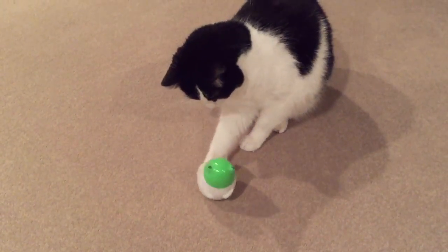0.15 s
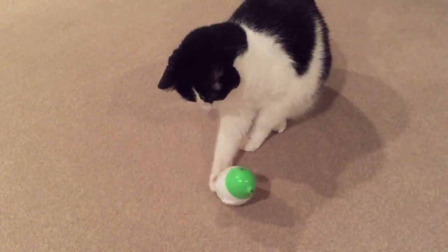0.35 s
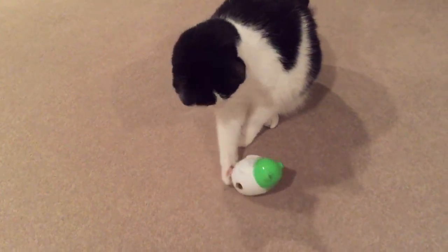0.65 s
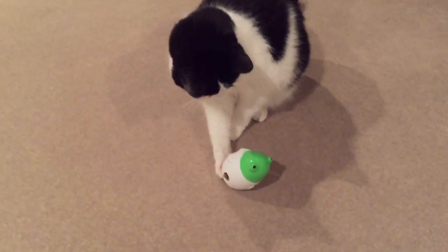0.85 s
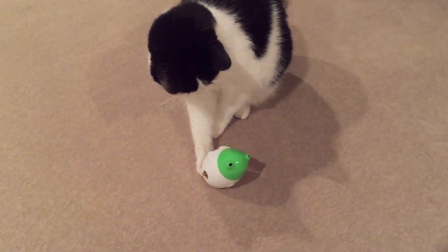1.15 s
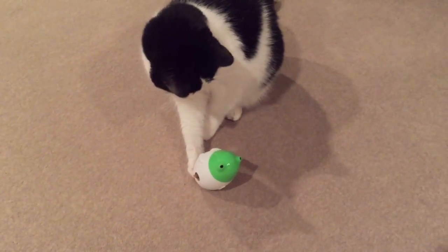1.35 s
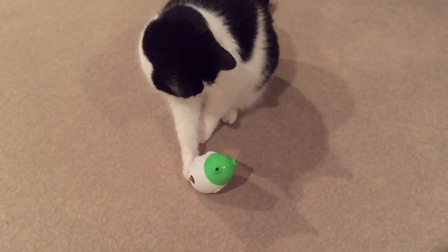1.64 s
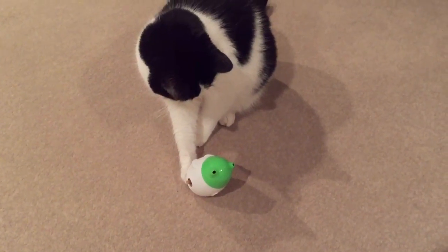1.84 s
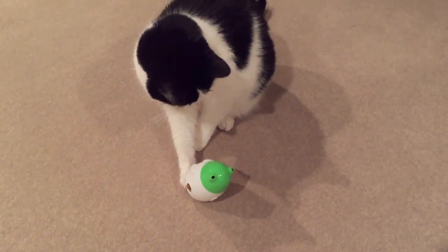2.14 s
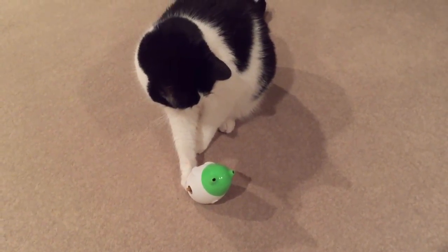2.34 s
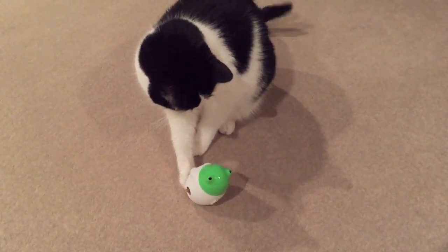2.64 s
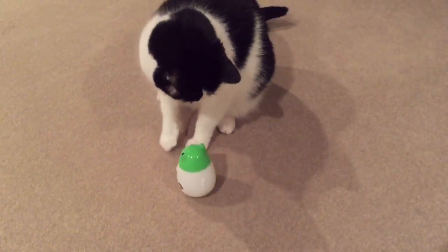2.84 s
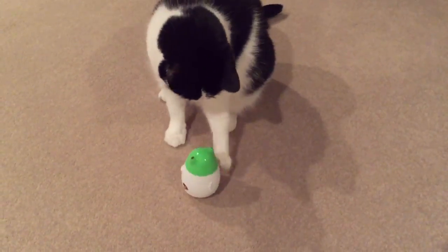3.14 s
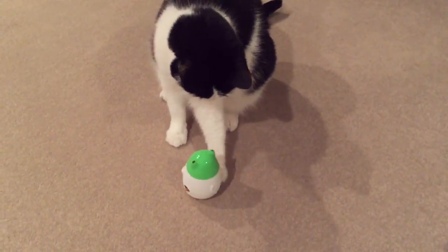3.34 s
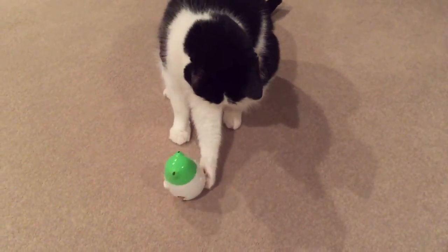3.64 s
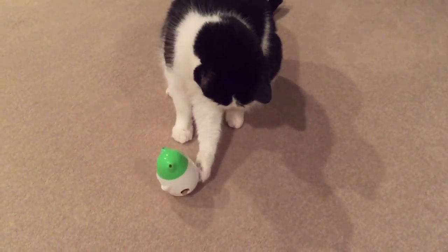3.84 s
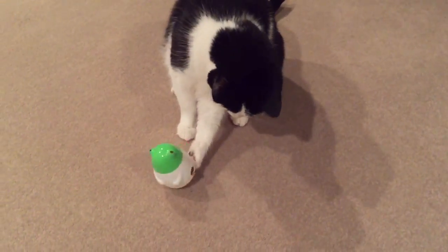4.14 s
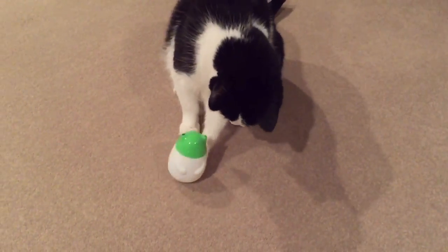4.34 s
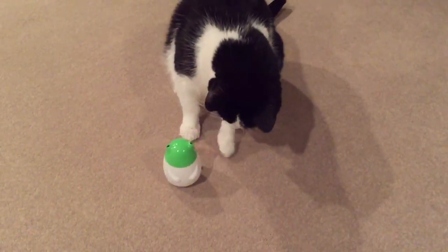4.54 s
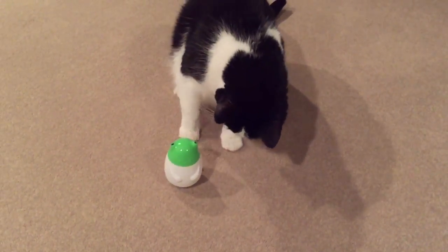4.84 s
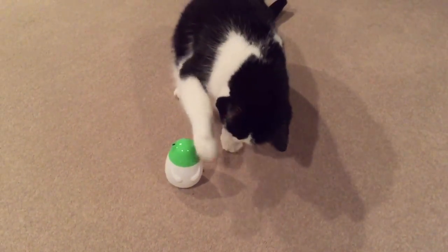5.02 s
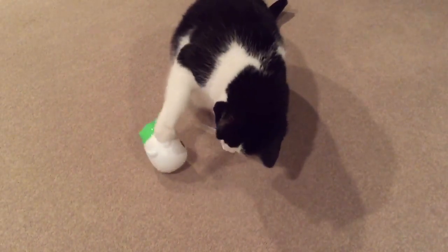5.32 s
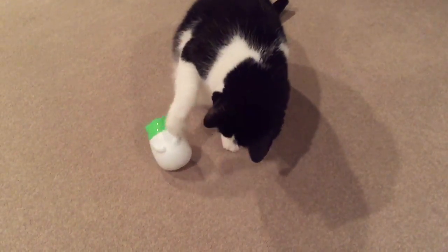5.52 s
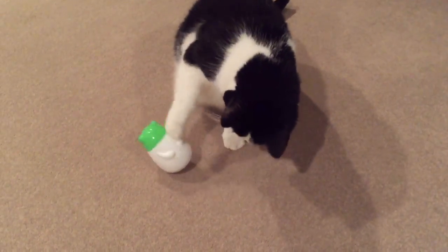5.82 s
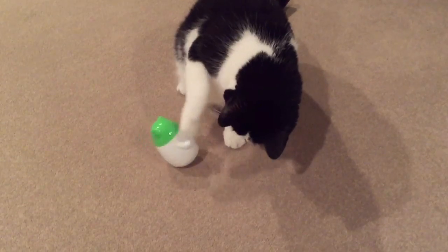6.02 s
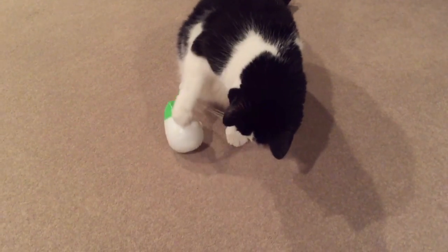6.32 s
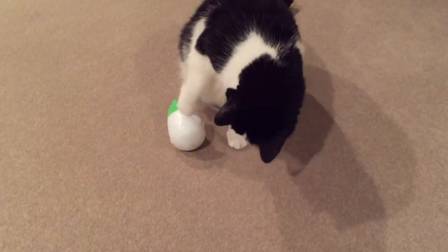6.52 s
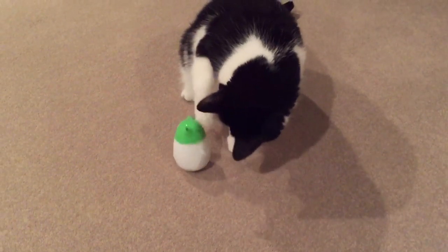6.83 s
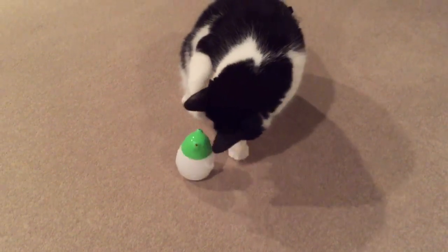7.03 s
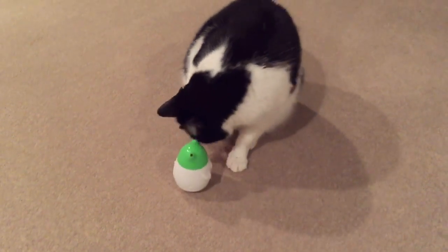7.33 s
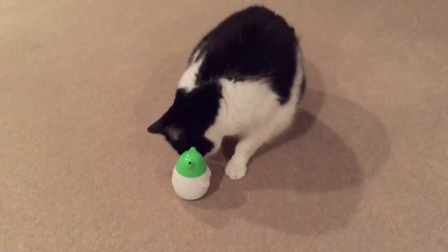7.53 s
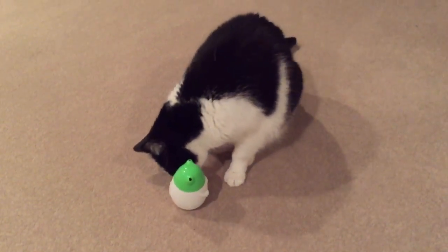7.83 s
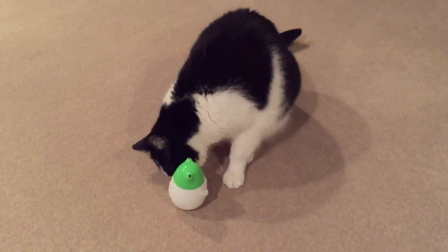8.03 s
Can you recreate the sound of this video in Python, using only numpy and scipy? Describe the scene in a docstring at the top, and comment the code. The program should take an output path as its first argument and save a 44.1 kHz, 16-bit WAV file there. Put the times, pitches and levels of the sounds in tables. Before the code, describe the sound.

Light clicks and muffled paw taps come from a plastic wobble toy filled with treats. They stop briefly, return as sparse ticks, then build into several brighter bursts of rattling as the cat tips the toy and the treats shift inside. It is all heard close up in a quiet room with little echo, over a low rumble and faint household hum.

```python
"""A soft rustle, a knock and dry clicks: a cat paws a hollow plastic wobble toy of treats on a carpet.
The paw brushes the wall, and paw and claws knock on it and sound the cavity; when the toy tips, the
treats slide, tumble and ring the hard shell. One microphone, close by in a quiet room: ceiling and
furniture answer briefly, and a low indoor rumble lies behind it all."""
import sys
import numpy as np
from scipy import signal
from scipy.fft import rfft, irfft, next_fast_len
from scipy.io import wavfile
from scipy.ndimage import map_coordinates

SR = 44100
rng = np.random.default_rng(int(sys.argv[2]) if len(sys.argv) > 2 else 0)


def log_audio(samples):
    """Write samples as a 16-bit WAV file to the path given in sys.argv[1]."""
    # one column per channel
    frames = np.atleast_2d(samples).T
    # limit to full scale, then quantise
    limited = np.clip(frames, -1, 1)
    pcm = np.round(limited * 32767).astype(np.int16)
    wavfile.write(sys.argv[1], SR, pcm)


N = 360289

# Room tone, rumble and hiss. Each row: frequency in Hz, relative spectral density in dB.
RUMBLE_SPECTRUM = [(20, -50), (36, -23.5), (50, -22), (61, 2.5), (72, -4.5), (100, 0), (120, -7.5),
                   (145, -17.5), (220, -30.5), (500, -78)]
HISS_SPECTRUM = [(88, -7), (150, -3), (241, -1.5), (294, -7), (331, -4), (366, -9), (437, -8.5),
                 (512, -13.5), (576, -10.5), (823, -16.5), (964, -13.5), (1130, -15.5), (3220, -18),
                 (17000, -29)]
# The rumble's slow drift. Each row: time in seconds, level in dB.
RUMBLE_DRIFT = [(0, -59), (.3, -64.5), (1.4, -62.5), (1.6, -61.5), (2.5, -60.5), (2.8, -62.5), (4.1, -60),
                (5.3, -65.5), (5.55, -60.5), (6.5, -62.5), (7.2, -59), (7.8, -65), (8.08, -56)]
# Faint household hum. Each row: frequency in Hz, level in dB.
HUM_TONES = [(80.7, -69), (238, -84.5), (334, -81)]
# The room's diffuse tail. Each row: frequency in Hz, seconds to fall 60 dB.
ROOM_DECAY = [(200, 0.068), (1000, 0.33), (3500, 0.21), (7000, 0.2), (14000, 0.15)]
# Early echoes at the microphone. Each row: delay in seconds, relative level in dB.
EARLY_ECHOES = [(.0093, -23), (0.0242, -18.5)]
# Modes of the plastic shell. Each row: frequency in Hz, relative level in dB, seconds to fall 60 dB.
SHELL_MODES = [(842, -19, 0.013), (930, -19, 0.013), (1410, -31, 0.039), (1610, -15.5, 0.056),
               (1986, 6.5, 0.014), (2140, -12, 0.07), (2776, 2, 0.056), (3496, 18.5, 0.015),
               (3522, 10, 0.052), (3990, 19, 0.026), (4384, 7, 0.025), (5180, 18, 0.01), (6400, 2.5, 0.032),
               (6610, 21.5, 0.0029), (8050, -33, 0.0092), (8760, 12, 0.0042), (8700, -24, 0.03),
               (11300, -30, 0.034)]
# Contact noise of a rustle, a knock and a click. Each row: frequency in Hz, gain in dB.
GRIT_SPECTRUM = [(200, -24), (450, -21), (750, -8.5), (1200, -9), (2000, 1.5), (3500, -2.5), (6000, -9.5),
                 (9500, -16), (16000, -31)]
THUD_SPECTRUM = [(200, -16), (420, -5), (900, -1), (2000, -10), (2800, -45), (3700, 14.5), (5000, 1),
                 (8000, 1), (15000, 27)]
CRACK_SPECTRUM = [(300, 11), (1000, -0.5), (2000, -11.5), (3800, 10), (4700, 6), (5600, -1), (7000, -0.5),
                  (8200, -14.5), (9600, -8.5), (10800, -17), (16000, -25.5)]
# Soft rustles: a paw brushes the toy, or the treats slide as it tips.
# Each row: start and end in seconds, strength in dB, loose treats per second.
RUSTLES = [(0, 0.114, -60, 0), (.203, 0.267, -60, 0), (0.364, 0.527, -58, 0), (.67, 0.837, -56, 25),
           (3.529, 3.564, -57.5, 0), (3.642, 3.698, -54.5, 0), (3.79, 3.839, -63, 20),
           (5.397, 5.52, -57.5, 0), (5.517, 5.591, -40.5, 40), (5.8, 5.93, -50, 40),
           (6.003, 6.068, -55, 35), (6.251, 6.3, -57.5, 20), (6.344, 6.421, -60, 35),
           (6.468, 6.605, -54, 10), (6.579, 6.671, -39, 37), (7.072, 7.213, -40.5, 35)]
# Dull knocks on the toy. Each row: start in seconds, wall band level in dB, hardness in dB,
# claw tick in dB relative to the wall band.
PAW_KNOCKS = [(0.0894, -46.5, 0.5, -8.5), (0.2552, -62, 2.5, -7), (0.3598, -50, 5, -10.5),
              (0.5515, -52, -1, -13), (.661, -52, 2, -10), (3.0245, -61.5, 2, -12),
              (3.5542, -60.5, -0.5, 1.5), (3.6652, -57.5, 4, -9), (3.6752, -51, 3.5, -8.5),
              (4.273, -58, -0.5, -11.5), (4.5022, -61, -3, -11.5), (5.3643, -49.5, 2, -13.5),
              (5.3805, -51.5, 0.5, -11), (5.867, -61, 4, -18), (6.431, -50, -1, -7),
              (6.6408, -57, -3.5, -5), (7.0872, -62.5, -4.5, -15), (7.1451, -58.5, -3.5, -13)]
# Edges in Hz of a knock's four bands: cavity, wall, upper wall, claw tick.
KNOCK_EDGES_HZ = [360, 750, 1400, 2400, 7000]
# Balance of the first three of those bands. Each row: relative level in dB, dB per dB of hardness.
KNOCK_BALANCE = [(2, -1.5), (0, 0), (-2, .5)]
# The clearest strikes of a treat on the shell. Each row: start in seconds, mid band level in dB,
# low, high and top band in dB relative to it, chatter time in milliseconds.
TREAT_STRIKES = [(.0905, -53.5, -2, 1.5, -3.5, 1.7), (.2501, -59, -9, 1, -7, 1.1),
                 (.4212, -43, -14, -6.5, -1, 0.71), (.4685, -61, -20, 0, -18, 0.98),
                 (.649, -60, -1, 8.5, 0, .5), (.6733, -43.5, -5.5, -5, -10.5, 2),
                 (.6875, -48, -13, -10, -17, 1.4), (.7195, -49, -16, -5.5, -23, 0.68),
                 (.757, -42.5, -8, 3, -8, 2.3), (.7736, -43, -10.5, -5, -8, 0.83),
                 (.809, -50, -21, -8, -22, 0.8), (.872, -61.5, -15, 0, -2, 0.78),
                 (.9625, -40.5, -16, 8.5, -4, 1.2), (.988, -53, -17, -9, -14, .7),
                 (2.9024, -69.5, -3, 1, -9, .5), (2.9658, -52.5, -5.5, -12, -12, 0.54),
                 (3.0361, -45, -3.5, -3, -9, 1.2), (3.8207, -56.5, -13, -6, -13, .85),
                 (3.962, -37, -22, -4, -19, 1.36), (5.4528, -40, -26, -8, -7, 0.83),
                 (5.4659, -34, -10.5, -6.5, -6.5, 1.5), (5.5317, -38, -10, -15, -10, 1.5),
                 (5.5386, -31.5, -15, -9, -13, .5), (5.5462, -26.5, -15.5, -14.5, -10, 1.9),
                 (5.5539, -34.5, -12.5, -10, -9, 3.2), (5.567, -36.5, -22.5, -5.5, -6, 1.6),
                 (5.6298, -52, -5.5, -2, -6, .5), (5.8077, -57, 2.5, -5, -17, 0.37),
                 (5.8447, -64, 11, -13, 11, 1), (5.8803, -44, -11.5, -6.5, -23, 1.2),
                 (5.9258, -44, -14.5, -7, -14, 1.7), (5.944, -49.5, -16, -9, -12, 1.8),
                 (6.0015, -42, -8, -13.5, -15.5, 1.8), (6.0307, -39, -11.5, -17, -16, 0.2),
                 (6.0415, -42, -29, -1.5, -6.5, 0.54), (6.0564, -35.5, -17, -11, -6, 0.77),
                 (6.0857, -43, -22, -13, -15, 2), (6.2606, -56.5, -10, 6, 5, 1.8),
                 (6.2758, -48.5, -18, -0.5, -6, 1.3), (6.2915, -52, -8, -8, -9, 0.7),
                 (6.3483, -56, 5, -4, -4, 1.4), (6.4812, -56.5, -2, -4, -9, 1.3),
                 (6.53, -49.5, 0, 0.5, 0.5, 1.1), (6.5618, -42, -10, -4.5, -9, 3.4),
                 (6.5766, -41.5, -8, -10, -11, 2.2), (6.5918, -40, -24, -4, -15, 0.45),
                 (6.5968, -33, -27, -13, -11, .7), (6.6068, -33, -9.5, 0.5, -5, 1.1),
                 (6.6225, -38, -7, 7, 5, 1.6), (6.6398, -41, -11, -11, -18, 1.4),
                 (6.6701, -38.5, -6.5, -5, -14, 0.52), (6.6745, -35.5, -12, 2.5, 1.5, 0.59),
                 (6.6997, -40.5, -12, -12, -10, 0.92), (7.0104, -43, -6, 5, -6, 1.05),
                 (7.0333, -49, -11, 0, -10, 1.2), (7.0772, -56, -1, -7, -17, .7),
                 (7.087, -41.5, -0.5, -3.5, -17, 0.95), (7.1224, -40, -7, 1, -2, 0.91),
                 (7.1384, -42, -13, 4, 1, 1.3), (7.1643, -42, -20, 10, 2.5, 0.35),
                 (7.1905, -29.5, -7.5, -1.5, -9, 0.7), (7.1975, -35.5, -12, -5, -5.5, 0.59)]
# Edges in Hz of a strike's four bands: low, mid, high, top.
TREAT_EDGES_HZ = [1200, 2400, 4700, 7500, 16000]
# As the toy leans, treats land on different walls. Each row: time in seconds, lowest mode in Hz.
LOWEST_WALL_MODE = [(.3, 1820), (.96, 1670), (2.9, 2230), (4.0, 2180), (5.45, 1620), (6.1, 1690),
                    (6.35, 2325), (6.6, 1895), (7.0, 2120)]

HEAVE_DB, HEAVE_PER_S = 3.5, 12  # depth and pace of the rumble's heaving
CAVITY_HZ = 544  # the air in the hollow body
GENTLE_DB = -59.5  # strength of a gentle rustle
AIR_DB, AIR_GROWTH = -75.5, 0.64  # the cavity in a gentle rustle; dB per dB of a stronger one
LOOSE_DB, LOOSE_GROWTH = -63.5, 0.89  # the same for a loose treat
LOOSE_COLOUR_DB, LOOSE_SCATTER_DB = (-2.5, -2, -7), 2.5  # its low, high, top band; scatter per band
LOOSE_CHATTER_MS, LOOSE_CHATTER_SPREAD = 1.6, 0.3  # its chatter time; log spread
SPOT_HZ, SPOT_HZ_PER_DB, SPOT_SPREAD = 3214, 32, 0.069  # struck spot: ring, rise with brightness, spread
BAND_LIMIT_HZ = 17300


def amp(db):
    """Decibels to gain."""
    return 10 ** (np.asarray(db) / 20)


def unit(x):
    """x at rms 1."""
    return x / np.sqrt(np.mean(x ** 2) + 1e-20)


def along(points, hz):
    """(Hz, value) points interpolated on a log frequency axis."""
    point_hz, values = np.transpose(points)
    return np.interp(np.log(hz + 1), np.log(point_hz), values)


def coloured(x, spectrum):
    """x through a causal filter with this (Hz, dB) shape."""
    size = 2 * next_fast_len(len(x) // 2 + 2048)
    gain = amp(along(spectrum, np.fft.rfftfreq(size, 1 / SR)))
    cepstrum = irfft(np.log(gain))
    cepstrum[1:size // 2] *= 2  # fold to minimum phase
    cepstrum[size // 2 + 1:] = 0
    return irfft(rfft(x, size) * np.exp(rfft(cepstrum)), size)[:len(x)]


def wander(rate):
    """A smooth random curve through rate points a second."""
    points = rng.standard_normal(int(N * rate / SR) + 4)
    return map_coordinates(points, [np.arange(N) * rate / SR])


def add(track, start, x):
    """Mix x into track from start seconds on."""
    part = track[round(start * SR):][:len(x)]
    part += x[:len(part)]


def resonance(x, hz, width_hz):
    """x through one damped mode."""
    r = np.exp(-np.pi * width_hz / SR)
    return signal.lfilter([1 - r, 0, r - 1], [1, -2 * r * np.cos(2 * np.pi * hz / SR), r * r], x)


def band_filters(edges):
    """A band-pass between each pair of neighbouring edges."""
    return [signal.butter(4, band, "bandpass", fs=SR, output="sos") for band in zip(edges, edges[1:])]


def balanced(x, filters, levels_db, span_s):
    """The spot that is struck sets each band's rms level over the first span_s seconds."""
    bands = [signal.sosfilt(sos, x) for sos in filters]
    onset = int(span_s * SR)
    return sum(amp(db) * band / np.sqrt(np.mean(band[:onset] ** 2)) for band, db in zip(bands, levels_db))


def room_tone():
    """All around the microphone: the building's heaving rumble, a faint hum and steady hiss."""
    t = np.arange(N) / SR
    rumble_db = np.interp(t, *np.transpose(RUMBLE_DRIFT)) + HEAVE_DB * wander(HEAVE_PER_S)
    rumble = amp(rumble_db) * unit(coloured(rng.standard_normal(N), RUMBLE_SPECTRUM))
    hum = sum(amp(db + 2.6 * wander(2.92)) * np.sin(2 * np.pi * hz * t + 1.25 * wander(2.6))
              for hz, db in HUM_TONES)
    hiss = amp(-69) * unit(coloured(rng.standard_normal(N), HISS_SPECTRUM))
    return rumble + hum + hiss


def room(x, wet_db, echoes_db):
    """Toy to microphone: direct sound, early echoes and a short tail, new each time as the toy moves."""
    hz, t, noise = signal.stft(rng.standard_normal(SR // 3), SR, nperseg=128)
    decay = amp(-60 * t / along(ROOM_DECAY, hz)[:, None])
    tail = signal.istft(noise * decay, SR, nperseg=128)[1]
    tail *= 1 - np.exp(-np.arange(len(tail)) / SR / 0.00043)
    response = amp(wet_db) * tail / np.linalg.norm(tail)
    response[0] = 1
    for delay, db in EARLY_ECHOES:
        response[int(delay * SR)] += amp(db + echoes_db)
    return signal.fftconvolve(x, response)


def shell_ring(t):
    """The shell's damped modes, with new strengths and slight detuning for every blow."""
    hz, db, t60 = np.transpose(SHELL_MODES)[:, :, None]
    strength, detune, phase = rng.standard_normal((3, len(SHELL_MODES), 1))
    decay = amp(db + 2 * strength - 60 * t / t60)
    return np.sum(decay * np.sin(2 * np.pi * (hz * (1 + 0.014 * detune) * t + phase)), axis=0)


def soft_rustles():
    """A brushing paw or sliding treats make many tiny contacts that stir shell and cavity."""
    out, t = np.zeros(N), np.arange(SR // 20) / SR
    for start, end, db, _ in RUSTLES:
        n = int((end - start) * SR)
        contacts = (rng.random(n) < 1500 / SR) * rng.standard_normal(n)  # about 1500 a second
        shell = signal.fftconvolve(contacts, shell_ring(t))[:n]
        grit = amp(-10) * unit(coloured(contacts, GRIT_SPECTRUM))
        grit += amp(-16.5) * unit(coloured(shell, GRIT_SPECTRUM))
        cavity_hz = CAVITY_HZ * (1.05 + 0.03 * rng.standard_normal())
        air = resonance(contacts, cavity_hz, width_hz=170)
        air = unit(resonance(air, cavity_hz, width_hz=170))
        air_db = AIR_DB + AIR_GROWTH * (db - GENTLE_DB)
        swell = np.sqrt(np.hanning(n).clip(0))
        rustle = swell * (amp(db) * grit + amp(air_db) * air)
        add(out, start, room(rustle, wet_db=-3, echoes_db=6))
    return out


def paw_knocks():
    """A paw's soft, long contact drives the low wall modes and the cavity; a harder one is brighter."""
    out, t = np.zeros(N), np.arange(SR // 10) / SR
    filters = band_filters(KNOCK_EDGES_HZ)
    band_db, tilt = np.transpose(KNOCK_BALANCE)
    force = amp(-60 * t / 0.014) * (1 - np.exp(-t / 0.0013))
    for start, db, hardness_db, claw_db in PAW_KNOCKS:
        thud = coloured(force * rng.standard_normal(len(t)), THUD_SPECTRUM)
        cavity_hz = CAVITY_HZ * (1 + 0.045 * rng.standard_normal())
        cavity = amp(-12 - 60 * t / 0.041) * np.sin(2 * np.pi * cavity_hz * t)
        knock = thud + cavity + amp(-24) * shell_ring(t)
        levels_db = db + np.append(band_db + tilt * hardness_db, claw_db)
        knock = balanced(knock, filters, levels_db, span_s=0.01)
        add(out, start, room(knock, wet_db=-6.5, echoes_db=-7))
    return out


def loose_strikes():
    """Treats tumble at random in some rustles, louder in stronger ones; rows as in TREAT_STRIKES."""
    strikes = []
    for start, end, db, per_s in RUSTLES:
        count = round(per_s * (end - start))
        times = start + (end - start) * (np.arange(count) + rng.random(count)) / max(count, 1)
        typical_db = np.array([LOOSE_DB + LOOSE_GROWTH * (db - GENTLE_DB), *LOOSE_COLOUR_DB])
        for time in times:
            levels_db = typical_db + LOOSE_SCATTER_DB * rng.standard_normal(len(typical_db))
            chatter_ms = LOOSE_CHATTER_MS * np.exp(LOOSE_CHATTER_SPREAD * rng.standard_normal())
            strikes.append((time, *levels_db, chatter_ms))
    return strikes


def treat_clicks(strikes):
    """In the foreground, each hard, rough treat chatters briefly on the plastic and rings the shell."""
    out, t = np.zeros(N), np.arange(SR // 20) / SR
    filters = band_filters(TREAT_EDGES_HZ)
    for start, db, low_db, high_db, top_db, chatter_ms in strikes:
        age = 1000 * t / chatter_ms
        contact = age * np.exp(-1.5 * age)
        crack = coloured(contact * rng.standard_normal(len(t)), CRACK_SPECTRUM)
        # two heavily damped modes of the struck spot swell and die with the contact
        spot_hz = SPOT_HZ + SPOT_HZ_PER_DB * (high_db - low_db)  # a stiffer spot is brighter and higher
        spot_hz *= np.exp(SPOT_SPREAD * rng.standard_normal())
        upper_hz = 5650 * (1 + 0.025 * rng.standard_normal())
        spot = amp(19.5) * np.sin(2 * np.pi * spot_hz * t) + amp(18.5) * np.sin(2 * np.pi * upper_hz * t)
        # the lowest wall mode lingers longer
        wall_hz = np.interp(start, *np.transpose(LOWEST_WALL_MODE)) * (1 + 0.019 * rng.standard_normal())
        wall = amp(-22.5 - 60 * t / 0.03) * np.sin(2 * np.pi * wall_hz * t)
        click = crack + contact ** 2 * spot + wall + amp(-33) * shell_ring(t)
        levels_db = db + np.array([low_db, 0, high_db, top_db])
        click = balanced(click, filters, levels_db, span_s=0.0037)
        add(out, start, room(click, wet_db=-10, echoes_db=-8))
    return out


def scene():
    """The toy on the carpet, heard by one microphone close by."""
    mix = room_tone() + treat_clicks(TREAT_STRIKES) + paw_knocks() + soft_rustles()
    mix += treat_clicks(loose_strikes())
    return mix[None]


def record(dry):
    """The camera keeps nothing above its band limit."""
    passband = np.fft.rfftfreq(N, 1 / SR) < BAND_LIMIT_HZ
    return irfft(rfft(dry) * passband, N)


dry = scene()
out = record(dry)
log_audio(out)
```